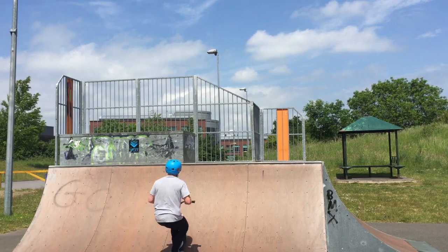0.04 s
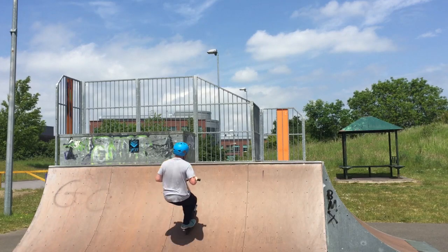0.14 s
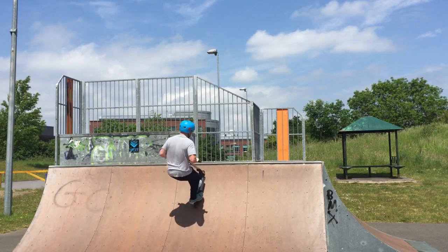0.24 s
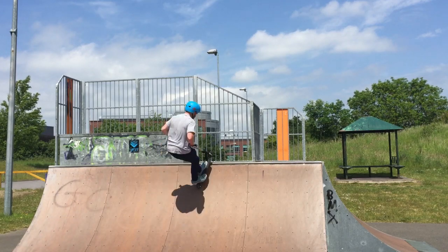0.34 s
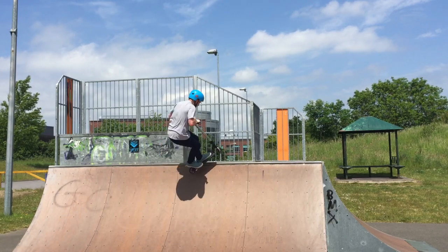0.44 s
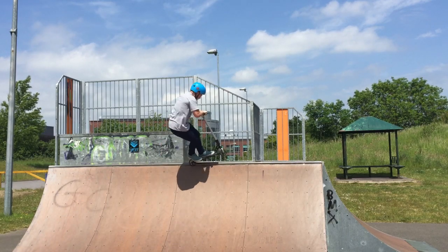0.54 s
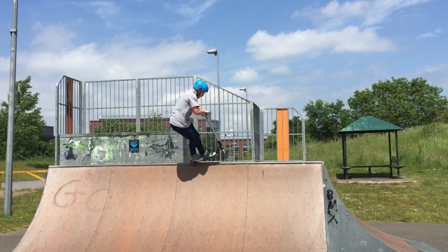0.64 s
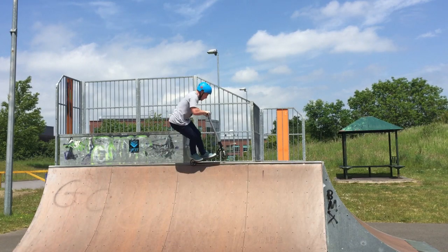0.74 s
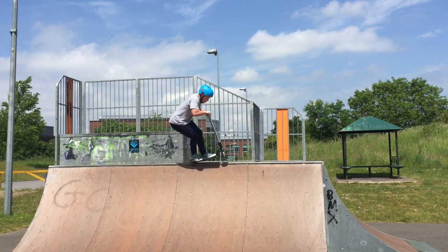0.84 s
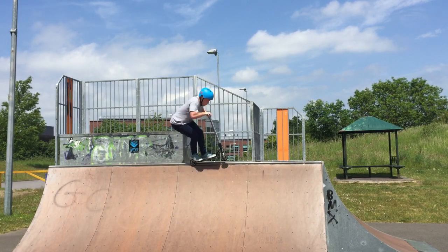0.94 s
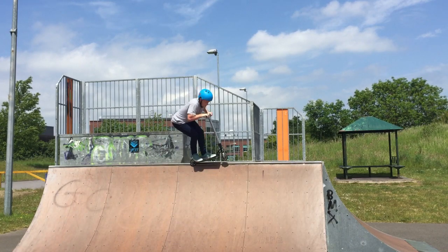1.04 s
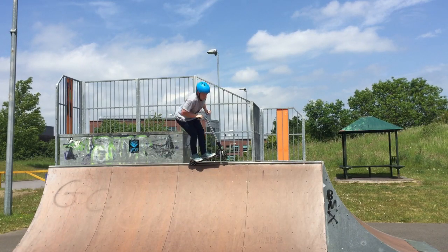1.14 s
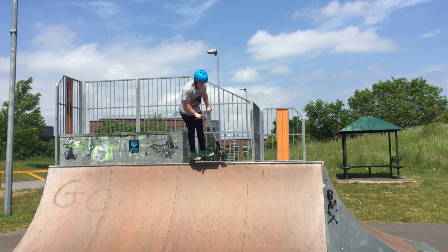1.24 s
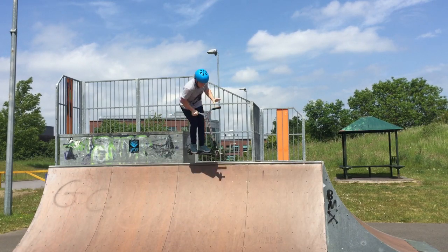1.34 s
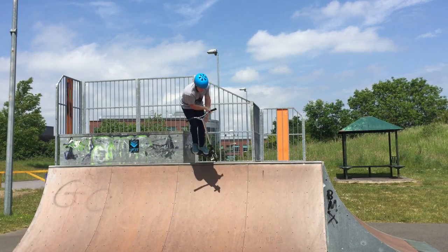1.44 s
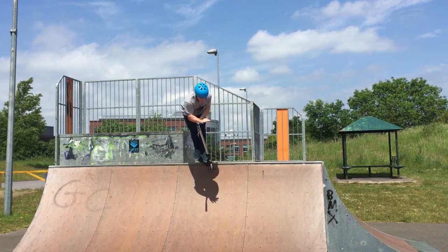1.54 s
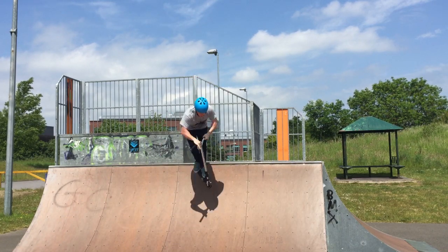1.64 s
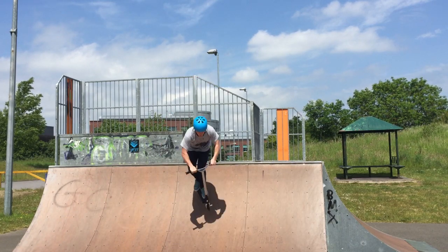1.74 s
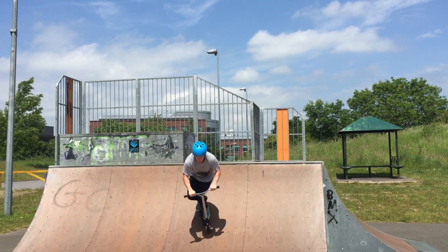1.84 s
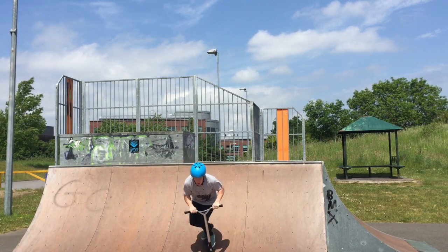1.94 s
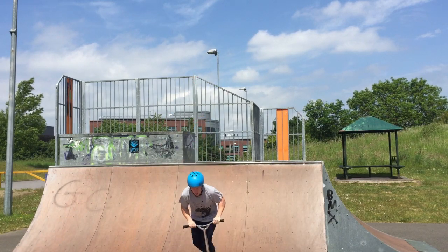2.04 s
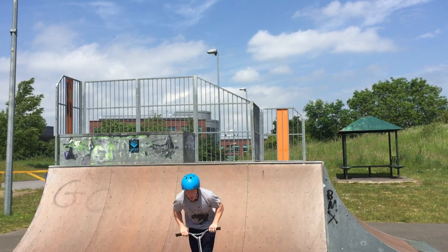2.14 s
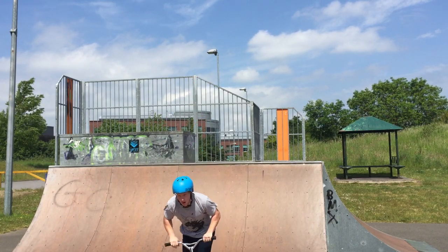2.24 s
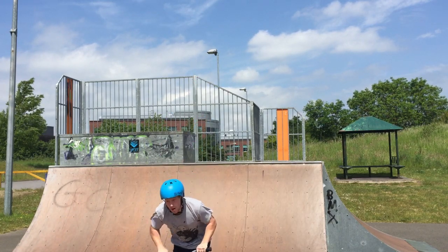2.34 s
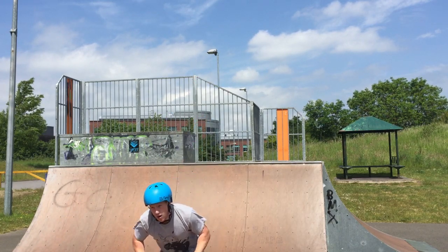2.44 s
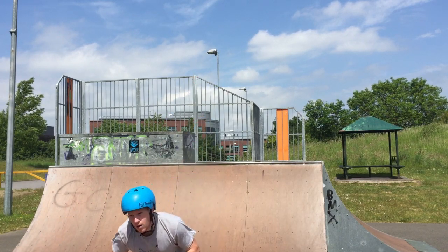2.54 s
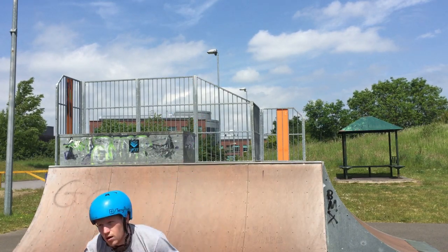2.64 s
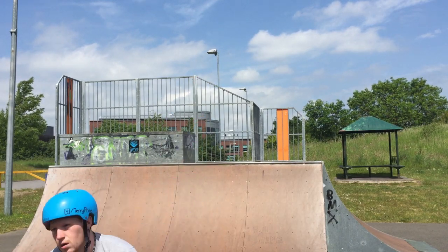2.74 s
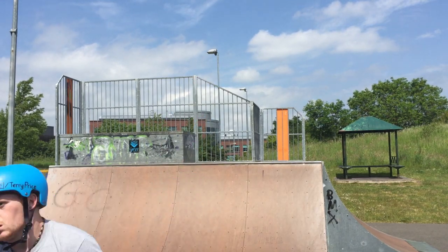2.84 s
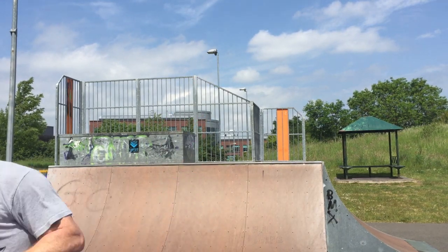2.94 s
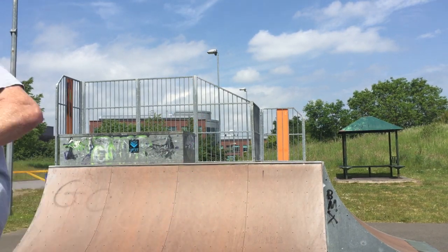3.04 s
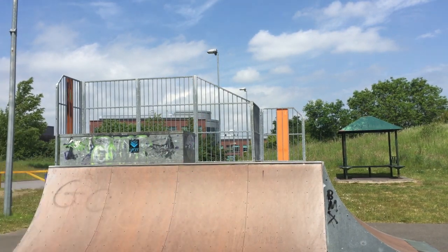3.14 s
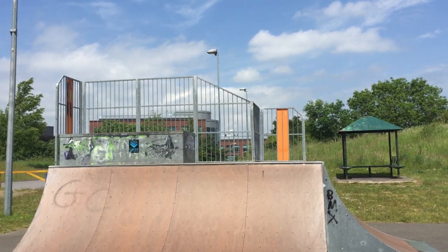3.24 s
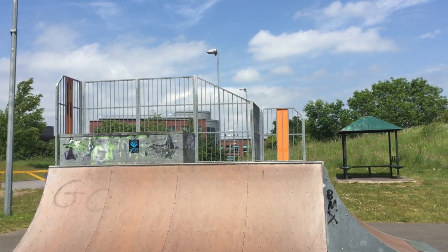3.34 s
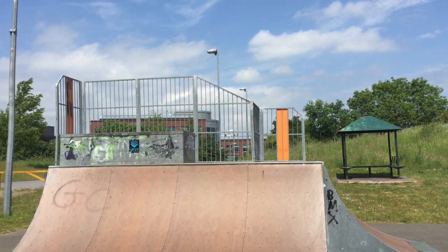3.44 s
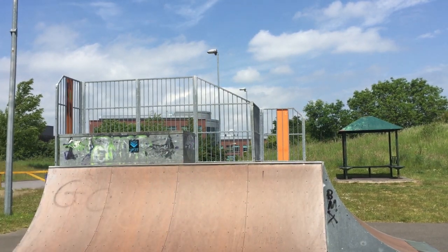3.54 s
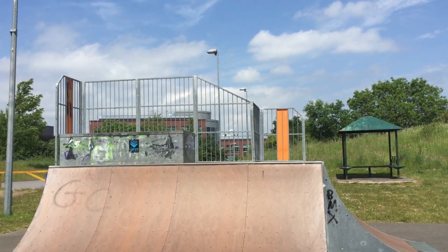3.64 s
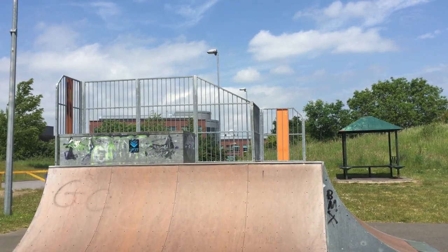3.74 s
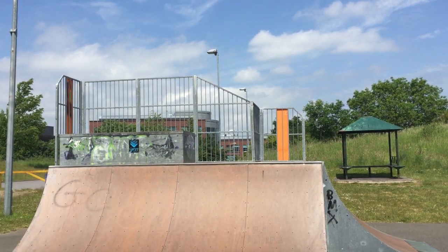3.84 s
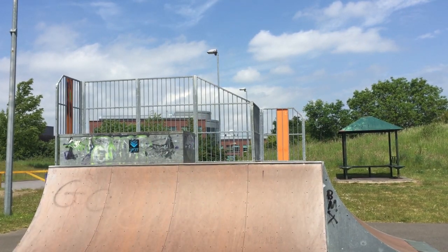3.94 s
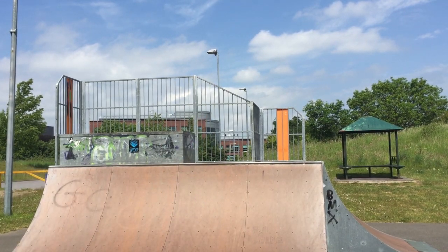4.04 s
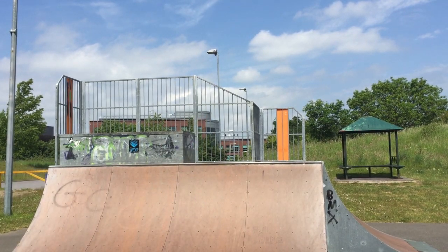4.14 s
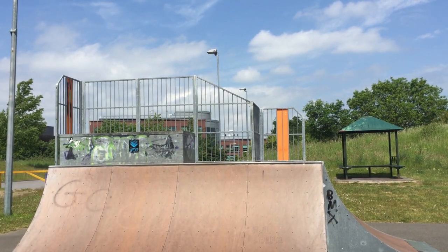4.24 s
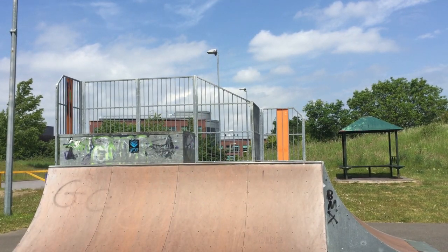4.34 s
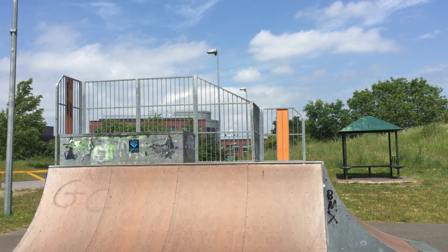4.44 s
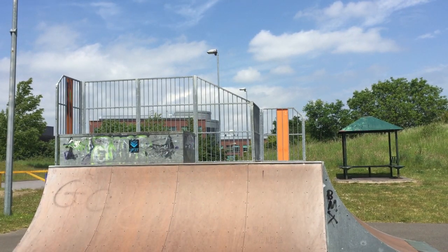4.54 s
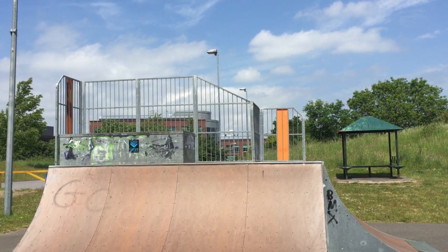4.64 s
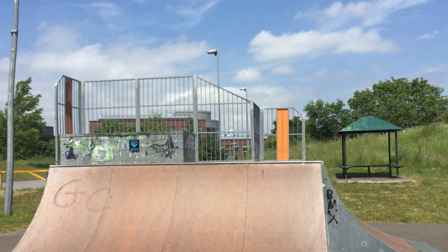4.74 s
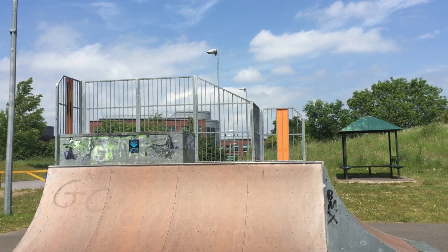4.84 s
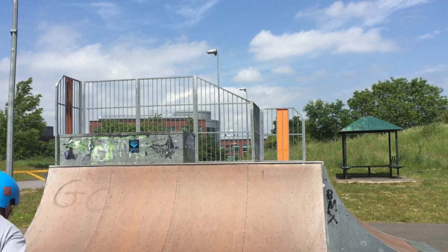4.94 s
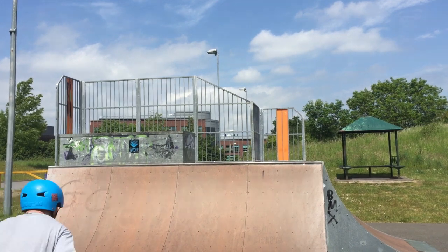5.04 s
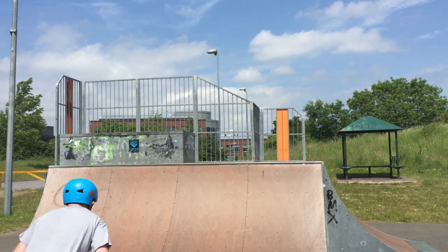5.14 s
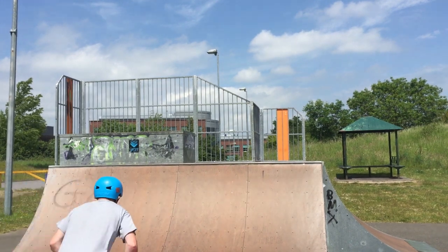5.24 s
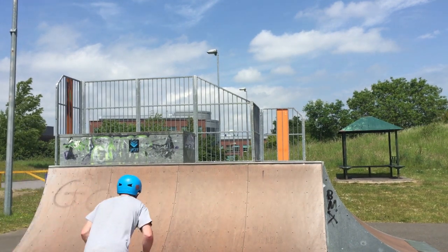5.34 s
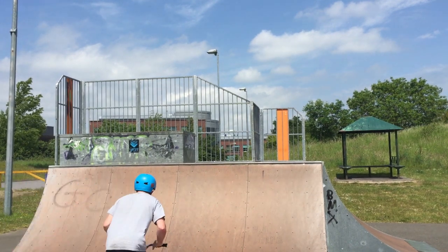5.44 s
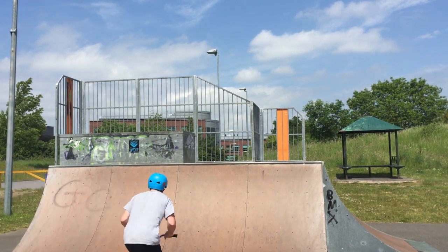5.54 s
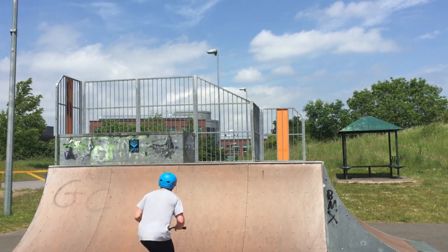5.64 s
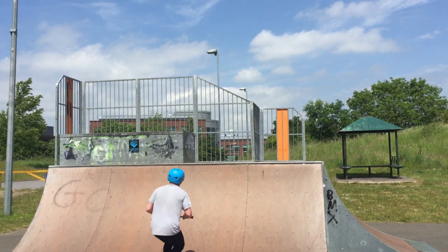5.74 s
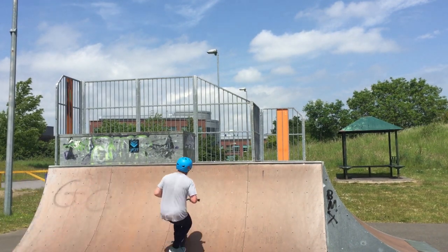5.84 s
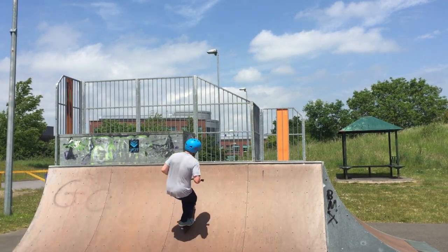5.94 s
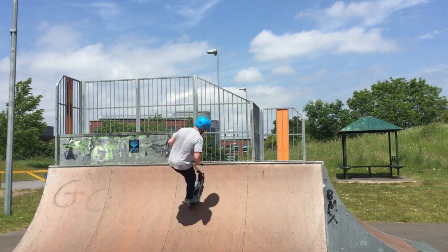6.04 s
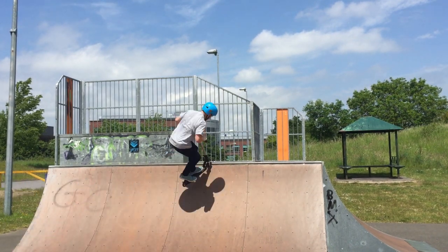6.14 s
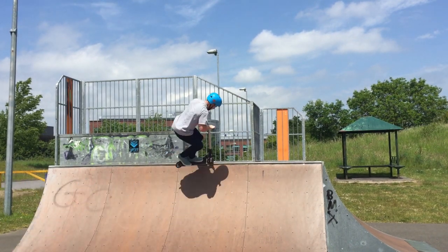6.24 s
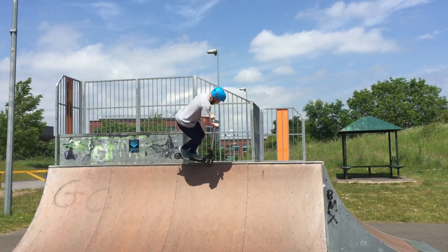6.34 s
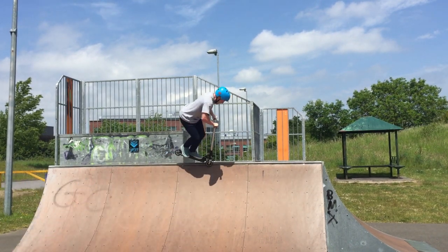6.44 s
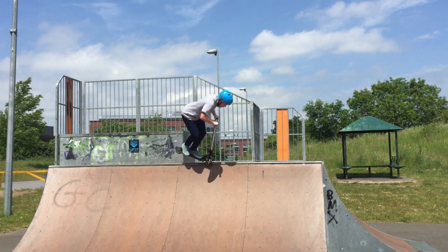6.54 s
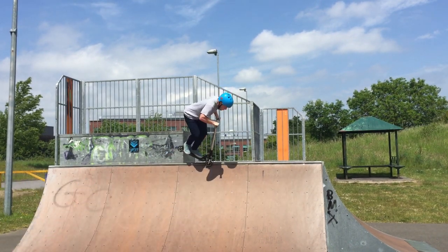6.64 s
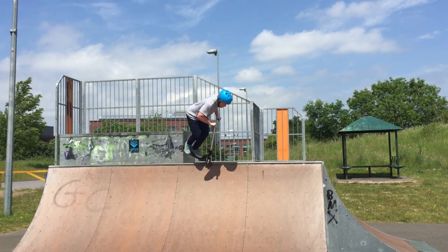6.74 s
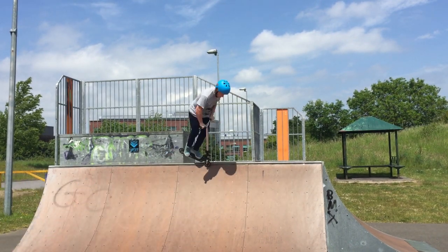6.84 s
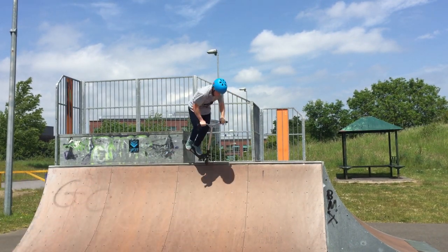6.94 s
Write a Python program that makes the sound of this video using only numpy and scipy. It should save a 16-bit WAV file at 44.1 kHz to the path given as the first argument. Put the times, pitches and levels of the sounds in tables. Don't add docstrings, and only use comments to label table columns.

```python
import sys
import numpy as np
from scipy import signal
from scipy.fft import rfft, irfft
from scipy.io import wavfile
from scipy.ndimage import uniform_filter1d, minimum_filter1d, map_coordinates

SR = 44100
rng = np.random.default_rng(int(sys.argv[2]) if len(sys.argv) > 2 else 0)


def magnitude_from_level(level_db):
    exponent = np.asarray(level_db, float) / 20
    return 10 ** exponent


def to_wav(sig):
    pcm = np.clip(np.atleast_2d(sig), -1, 1) * 32767
    pcm = np.round(pcm).astype(np.int16)
    wavfile.write(sys.argv[1], SR, pcm.T)


N = 308700


def unit(x):
    return x / np.sqrt(np.mean(x ** 2) + 1e-20)


def along(points, hz):
    f, v = np.transpose(points)
    return np.interp(np.log(hz + 1), np.log(f + 1), v)


def curves(rows):
    s, *columns = np.transpose(rows)
    return [np.interp(np.arange(N) / SR, s, column) for column in columns]


def wobble(rate):
    knots = rng.standard_normal(int(N * rate / SR) + 4)
    return map_coordinates(knots, [np.arange(N) * rate / SR])


def rush(spectrum, flutter_db, peaks=(), patchy_db=0):
    z = signal.stft(rng.standard_normal(N) * magnitude_from_level(flutter_db), nperseg=512)[2]
    patches = uniform_filter1d(rng.standard_normal(z.shape), size=4, axis=0)
    patches = uniform_filter1d(patches, size=10, axis=1)
    x = signal.istft(z * magnitude_from_level(patchy_db * unit(patches)), nperseg=512)[1]
    hz = np.fft.rfftfreq(len(x), 1 / SR)
    colour_db = along(spectrum, hz)
    for centre, width, db in peaks:
        colour_db = colour_db + db / (1 + (2 * (hz - centre) / width) ** 2)
    return unit(irfft(rfft(x) * magnitude_from_level(colour_db), len(x))[:N])


def puff(lo_hz, hi_hz, t, t60):
    band = signal.butter(N=3, Wn=[lo_hz, min(hi_hz, SR / 2.1)], btype="band", fs=SR, output="sos")
    noise = signal.sosfilt(band, rng.standard_normal(len(t) + 2000))[2000:]
    return unit(noise) * magnitude_from_level(-60 * t / t60)


def ring(modes, t, scatter_db, stretch=1, centre_hz=None):
    out = 0
    for hz, db, t60 in modes:
        near_db = 0 if centre_hz is None else -14 * abs(np.log2(hz / centre_hz))
        level_db = db + near_db + scatter_db * rng.normal()
        out = out + magnitude_from_level(level_db - 60 * t / (t60 * stretch)) * np.sin(2 * np.pi * hz * t)
    return out


def onset(t, rise):
    return 1 - np.exp(-t / rise)


def add(track, s, x):
    track[round(s * SR):][:len(x)] += x


# frequency in Hz, t60 in seconds.
PARK_DECAY = [(100, .25), (1000, 0.24), (4000, 0.13), (8000, .15), (14000, 0.11)]


def park(x):
    hz, t, z = signal.stft(rng.standard_normal(SR // 2), SR, nperseg=256)
    decay = magnitude_from_level(-60 * t / along(PARK_DECAY, hz)[:, None])
    tail = signal.istft(z * decay, SR, nperseg=256)[1]
    delayed = np.pad(x, (400, 0))
    return signal.fftconvolve(delayed, tail / np.linalg.norm(tail))


# start in seconds, peak level in dB, knock in dB, centre in Hz, decay in ms.
CLACKS = [(.7135, -10.5, -11.5, 2770, 23.6), (0.7172, -18.5, -1, 1620, 25), (0.7365, -20, -5, 3000, 28),
          (1.9274, -34, -1, 3260, 27), (1.9313, -32, 10, 2880, 17.5), (1.973, -49, 4, 4000, 21),
          (1.9872, -38.5, 17, 1800, 15), (1.998, -48.5, 23.5, 1680, 18), (2.7898, -25, -25, 3460, 9.4),
          (2.82, -13.5, -8, 5700, 8.2), (2.877, -17, -3, 3600, 6.2), (2.9027, -12, -9, 5460, 4.1),
          (2.902, -25, -22, 1900, 11), (3.5428, 1, -12, 4900, 14.6), (3.5643, -6.5, -4, 3060, 24),
          (3.565, -9.5, -19.5, 6400, 7.4), (3.6112, 13, -13.5, 2730, 16), (3.6125, 9, -20.5, 4600, 14),
          (3.6145, 4, -12, 1900, 21.6), (3.6593, -23.5, -11, 5000, 16), (5.062, -35.5, -14, 6800, 8.9),
          (5.0927, -25, 0.5, 2600, 11.4), (6.5127, -26, -3.5, 1710, 55), (6.5224, -16, -12, 4030, 16.3)]
# frequency in Hz, level in dB, t60 in seconds.
DECK_MODES = [(1600, 0, .025), (1960, -9, .025), (2400, -5, .03), (2620, 0, .028), (2830, -8, .022),
              (3050, -8, .025), (3400, -7, .03), (4240, -6, .03), (4680, -4, .025), (5470, -5, .03),
              (5920, -9, .03), (6600, -12, .035), (8500, -22, .06)]
# start in seconds, end in seconds, pitch in Hz, last level in dB.
SKID = (3.592, 3.611, 2640, -17)
EDGE_DB, EDGE_DB_PER_OCTAVE, EDGE_GROWS = -18.5, 7, 0.22


def deck():
    out, t = np.zeros(N + SR), np.arange(SR // 4) / SR
    for s, db, knock_db, hz, ms in CLACKS:
        t60 = ms / 1000
        blow = magnitude_from_level(db + 5.5) * onset(t, 0.09 * t60)
        body = 0.71 * ring(DECK_MODES, t, scatter_db=1, stretch=t60 / .023, centre_hz=hz)
        crack = 0.5 * puff(0.68 * hz, 1.194 * hz, t, t60) + 0.15 * puff(890, 5700, t, 1.7 * t60)
        knock = magnitude_from_level(knock_db - 1.5) * puff(500, 1500, t, 1.4 * t60)
        edge_db = EDGE_DB + EDGE_DB_PER_OCTAVE * np.log2(hz / 3000) + EDGE_GROWS * db
        sizzle = puff(6500, 11500, t, .9 * t60) + 0.66 * puff(11000, 15500, t, .7 * t60)
        broad = crack + knock + magnitude_from_level(edge_db) * sizzle
        add(out, s, blow * (body + broad))
        add(out, s, magnitude_from_level(-19) * park(blow * broad))
    start, end, hz, db = SKID
    u = t[t < end - start]
    swell = magnitude_from_level(db - 1100 * u[::-1])
    add(out, start, swell * np.sin(2 * np.pi * hz * u))
    return out[:N]


# start in seconds, peak level in dB, first pitch in Hz, panel in dB, cavity in dB.
THUMPS = [(0.138, -19.5, 258, -10, -11.5), (0.455, -15.5, 95, -21, -7.5), (0.719, -22, 160, -4.5, -8),
          (1.928, -3.5, 176.5, -18.5, -22.5), (1.941, -8.5, 165, -14, -23.5), (1.974, -4.5, 113, -15, -7.5),
          (1.999, -6, 93.2, -20, -22.5), (2.909, -21, 150, -1.5, -8.5), (3.021, -13, 92.7, -15.5, -5.5),
          (3.265, -17.5, 159, -22, -20), (3.289, -18, 160, -25.5, -9), (3.537, -8.5, 183, 0, -8),
          (3.55, -3.5, 91.5, -7.5, -3), (3.564, -0.5, 164, -14.5, -18.5), (3.611, -3.5, 258, 1.5, -11),
          (4.793, -7, 110, -17, -16), (4.825, -1.5, 91.5, -40.5, -8), (5.158, -22, 218, 2, -10),
          (5.91, -30, 132, -10, 6), (6.431, -18.5, 127.4, -33, -12), (6.516, -20, 92, -17, -8),
          (6.525, -11, 93.2, -11, -5.5), (6.545, -14.5, 137.8, -17, -8.5)]
# start in seconds, peak level in dB, first pitch in Hz, panel in dB.
BUMPS = [(0.167, -17, 108, -20), (0.27, -31, 129, 1), (1.036, -26, 170, -11), (1.577, -27.5, 225, -7.5),
         (2.14, -28, 163, -25), (2.24, -27, 184, -1.5), (2.319, -26.5, 187, -3), (2.755, -27, 94.2, -3),
         (2.945, -15, 98, -14), (3.069, -20, 90.6, -23), (3.118, -19, 92.1, -9), (3.659, -17.5, 130.5, -15),
         (3.698, -23.5, 150, -19.5), (4.37, -33, 90.5, -22), (4.499, -25.5, 163.3, -13.5),
         (5.084, -18, 91, -10), (5.12, -13, 94.3, -19), (5.278, -25.5, 92.5, -5.5),
         (5.721, -23, 189.5, -27), (6.414, -23, 151, -17.5)]
BUMP_CAVITY_DB = -12
THUMP_T60, T60_PITCH = .1, .3


def ramp():
    out, t = np.zeros(N + SR), np.arange(SR // 2) / SR
    bumps = [(*row, BUMP_CAVITY_DB) for row in BUMPS]
    for s, db, hz, panel_db, cavity_db in THUMPS + bumps:
        pitch_hz = hz * (0.6 + .55 * np.exp(-t / .045))
        t60 = THUMP_T60 * (hz / 120) ** T60_PITCH
        wave = np.sin(2 * np.pi * np.cumsum(pitch_hz) / SR) * magnitude_from_level(-60 * t / t60)
        panel = magnitude_from_level(panel_db - 1.8) * (puff(240, 520, t, .08) + 0.45 * puff(480, 740, t, .04))
        hollow_hz = 54 * (1 + 0.36 * np.exp(-t / 0.059))
        hollow = np.sin(2 * np.pi * np.cumsum(hollow_hz) / SR) * magnitude_from_level(-60 * t / 0.28)
        hollow = hollow + 0.99 * puff(42, 78, t, 0.3)
        cavity = magnitude_from_level(cavity_db) * hollow * onset(t, 0.021)
        add(out, s, magnitude_from_level(db + 1.73) * (wave + panel + cavity) * onset(t, 0.0035))
    return out[:N]


# time in seconds, rolling level in dB, ground coarseness in dB.
ROLL = [(0, -31, -5), (.27, -41.5, 1.5), (.5, -41, -11), (.9, -54, -22), (1.9, -55, 5), (2.11, -44, 7),
        (2.28, -37.5, -2), (2.59, -42.5, 1), (2.9, -26.5, 2), (3.06, -31, 4.5), (3.29, -47, 2),
        (3.75, -46.5, 8.5), (4.9, -49, 1.5), (5.07, -29.5, 0), (5.26, -37, 1.5), (5.5, -39, -4.5),
        (6.1, -43.5, -1), (6.4, -53, 0)]
# frequency in Hz, level in dB per Hz.
BOOM = [(25, -17.5), (40, -14), (60, 2), (100, -4.5), (150, -12), (250, -31), (400, -68)]
TYRE = [(80, -35), (150, 11.5), (250, 4), (450, -1.5), (800, -11), (1300, -7.5), (2200, -25), (3500, -68)]
GRIT = [(1000, -31.5), (2000, 11.5), (3500, 2), (6000, -5), (9000, -21), (14000, -28.5)]
BEARING = [(4000, -38), (7000, -10), (10000, -12), (12500, -4), (14500, -3), (16500, -8)]
# frequency in Hz, width in Hz, level in dB.
HUB = [(2700, 160, 6), (3800, 150, 2.5), (4316, 65, -2)]
# time in seconds, level in dB, half width in seconds.
SPINS = [
    (.03, -71, 0.12),
    (.29, -61, 0.047),
    (1.67, -74, 0.036),
    (2.96, -61, 0.069),
    (3.7, -66, .06),
    (5.1, -66, .12),
    (6.0, -66, 0.14),
]
BEARING_IDLE_DB = -84
ROLL_MID_DB, BOOM_DB, BOOM_FOLLOWS, GRIT_DB, GRIT_FOLLOWS = -42.5, -34.5, 0.25, -65.5, 0.96
BOOM_LAG_S = .12


def wheels():
    roll_db, coarse_db = curves(ROLL)
    swing_db, t = roll_db - ROLL_MID_DB, np.arange(N) / SR
    load = magnitude_from_level(BEARING_IDLE_DB) + sum(magnitude_from_level(db) * np.exp(-((t - s) / half) ** 2) for s, db, half in SPINS)
    jolts = wobble(110)
    boom_db = BOOM_DB + BOOM_FOLLOWS * np.interp(t - BOOM_LAG_S, t, swing_db)
    boom = magnitude_from_level(boom_db) * rush(BOOM, 2.5 * wobble(12))
    tyre = magnitude_from_level(roll_db - 1.5) * rush(TYRE, 3.2 * jolts + 1.4 * wobble(40), patchy_db=1.5)
    grit_db = GRIT_DB + GRIT_FOLLOWS * np.maximum(swing_db, -5) + coarse_db
    grit = magnitude_from_level(grit_db) * rush(GRIT, 2.6 * jolts + 0.9 * wobble(33), HUB, patchy_db=2.0)
    chatter = load * magnitude_from_level(-2.5) * rush(BEARING, 3.2 * jolts + 1.8 * wobble(27), patchy_db=1.5)
    return boom + tyre + grit + chatter


# start in seconds, peak level in dB, centre in Hz.
TICKS = [(0.0174, -44, 5660), (0.1032, -41.5, 5300), (0.2992, -48, 6980), (0.4644, -51, 5500),
         (1.4394, -55, 5510), (1.5743, -50, 5910), (2.7694, -49, 5010), (2.855, -40, 5000),
         (2.9194, -39, 5070), (2.9344, -47, 5740), (2.9894, -45, 5040), (3.1123, -47, 5630),
         (3.173, -52, 5300), (3.3404, -38, 13000), (3.628, -30.5, 4000), (3.702, -46, 4600),
         (5.0005, -42, 11600), (4.936, -54, 7940), (5.108, -48, 9000), (5.987, -48, 13000),
         (5.8794, -53, 5400), (6.0342, -44, 12800), (6.3659, -48, 12500)]
# start in seconds, peak level in dB, centre in Hz.
SCUFFS = [
    (1.6352, -51, 6000),
    (1.6542, -39.5, 6600),
    (3.515, -50.5, 4500),
    (3.89, -52, 8000),
    (4.10, -55, 8500),
    (4.485, -50, 5350),
    (4.791, -54, 6900),
]
# first time in seconds, period in seconds, stretch a turn as a ratio,
# level in dB, fade in dB per doubling of turns.
TURNS = [
    (.0174, 0.056, 1.1, -54, -1),
    (5.108, .05, 1.046, -48, 5),
]
TURN_COUNTS = (7, 10)
# share of its centre, centre in Hz above which it rises, extra share an octave.
TICK_LOW = (.4, 5000, .55)


def rattles():
    out, t = np.zeros(N + SR), np.arange(SR // 8) / SR
    share, above_hz, extra = TICK_LOW
    turns = []
    for (first, period, stretch, db, fade_db), count in zip(TURNS, TURN_COUNTS):
        for k in range(1, count):
            s = first + period * k * stretch ** (k / 2)
            turns.append((s, db - fade_db * np.log2(k), 7000))
    for rows, t60, rise in (TICKS + turns, 0.025, .0022), (SCUFFS, 0.069, .006):
        for s, db, hz in rows:
            low = min(share + extra * max(np.log2(hz / above_hz), 0), .85)
            add(out, s, magnitude_from_level(db - 2.5) * puff(hz * low, 2.6 * hz, t, t60) * onset(t, rise))
    return out[:N]


# frequency in Hz, level in dB, t60 in seconds.
RAIL_MODES = [(3500, 0, .27), (3120, -16, .3), (5600, -15, .1), (9900, -13, .1)]
# start in seconds, ring level in dB, decay stretch as a ratio.
RAIL_HITS = [
    (.714, -49, 1.7),
    (6.523, -37, 1),
]


def rail():
    out, t = np.zeros(N + SR), np.arange(SR // 2) / SR
    for s, db, stretch in RAIL_HITS:
        add(out, s, magnitude_from_level(db) * ring(RAIL_MODES, t, scatter_db=0, stretch=stretch) * onset(t, .006))
    return out[:N]


# centre time in seconds, pitch in Hz, level in dB, length in ms.
SQUEAKS = [
    (2.215, 3160, -62, 40),
    (2.63, 4520, -63, 50),
    (3.22, 2700, -57, 42),
]


def squeaks():
    t = np.arange(N) / SR
    sway = np.cumsum(1 + .015 * wobble(60)) / SR
    out = np.zeros(N)
    for s, hz, db, ms in SQUEAKS:
        swell = np.exp(-((t - s) / (ms / 2000)) ** 2)
        out += magnitude_from_level(db) * swell * np.sin(2 * np.pi * hz * sway)
    return out


# time in seconds, level in dB.
ROAD = [(0, -41.5), (1.5, -41), (2.2, -42), (3.4, -41.5), (4.1, -40.5), (4.9, -43.5), (5.8, -41),
        (7, -43.5)]
# frequency in Hz, level in dB per Hz.
ROAD_TONE = [(60, -5.5), (130, -8), (450, -21), (2000, -22.5), (2900, -38.5), (6000, -57.5), (13600, -68),
             (16000, -88)]
# frequency in Hz, width in Hz, level in dB.
ROAD_HUMP = [(974, 590, 12.5), (2470, 500, 1)]


def road():
    level_db, = curves(ROAD)
    return magnitude_from_level(level_db + 2.5) * rush(ROAD_TONE, 0.25 * wobble(5), ROAD_HUMP, patchy_db=0.98)


def scene():
    thumps = ramp()
    echo = magnitude_from_level(-11.5) * park(thumps)[:N]
    return (deck() + thumps + echo + wheels() + rattles() + rail() + squeaks() + road())[None]


def band_limit(x):
    return signal.sosfilt(signal.butter(12, 16500, fs=SR, output="sos"), x)


# frequency in Hz, gain in dB.
CAPSULE = [(20, -30), (33, -12), (48, 0), (15100, 0), (15400, -18), (16100, -30), (16300, -80)]


def record(dry):
    over_db = np.maximum(20 * np.log10(np.abs(dry) + 1e-9) + 6, 0)
    held_db = uniform_filter1d(-minimum_filter1d(-over_db, size=1500, origin=600), size=200)
    keep = np.exp(-1 / (.12 * SR))
    slow_db = signal.lfilter([1 - keep], [1, -keep], 2.2 * held_db)
    x = dry * magnitude_from_level(-.7 * np.maximum(held_db, slow_db))
    x = x / (1 + np.abs(x / .78) ** 6) ** (1 / 6)
    x = irfft(rfft(x) * magnitude_from_level(along(CAPSULE, np.fft.rfftfreq(N, 1 / SR))), N)
    return band_limit(x)


dry = scene()
out = record(dry)
to_wav(out)
```